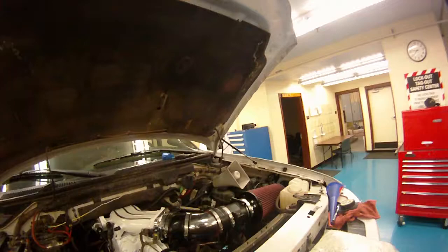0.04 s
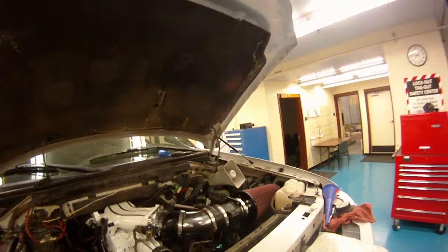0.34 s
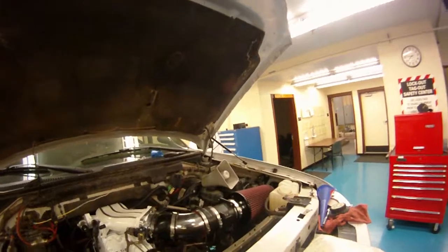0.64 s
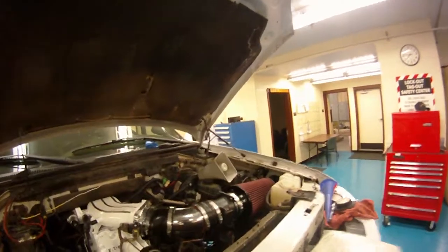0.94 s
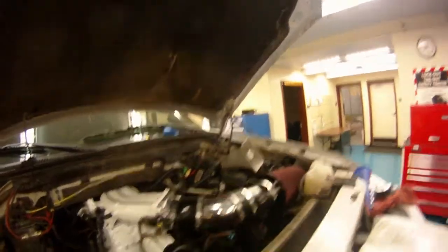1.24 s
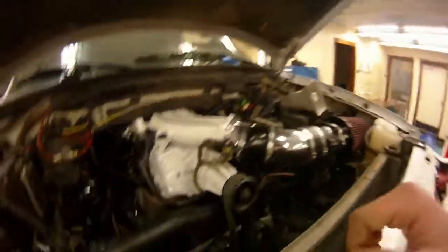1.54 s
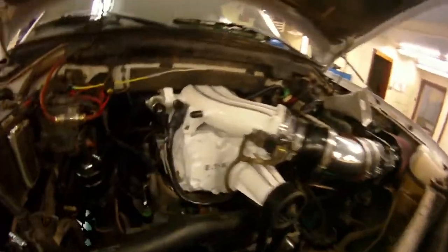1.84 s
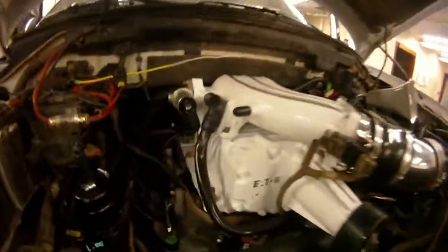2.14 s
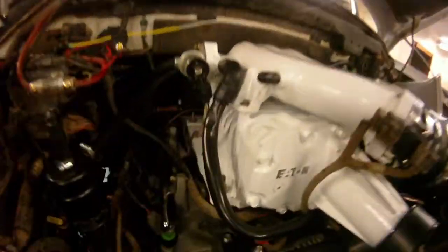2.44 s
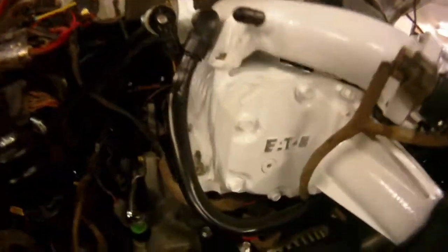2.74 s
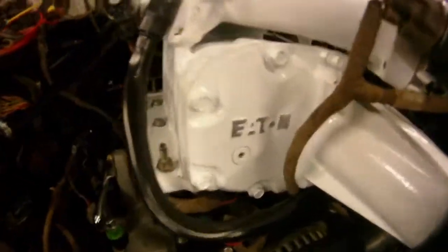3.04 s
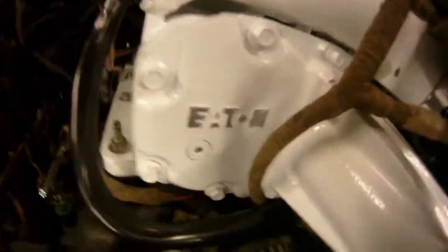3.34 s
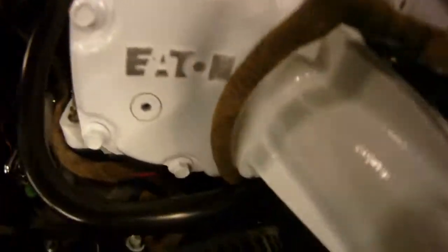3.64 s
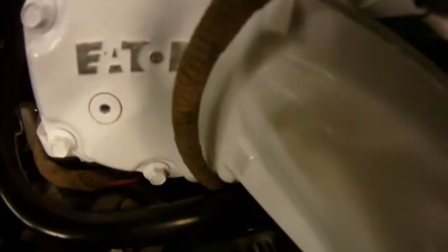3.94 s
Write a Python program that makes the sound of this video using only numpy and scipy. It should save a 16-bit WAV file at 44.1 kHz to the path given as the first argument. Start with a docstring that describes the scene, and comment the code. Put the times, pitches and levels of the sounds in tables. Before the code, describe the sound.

Steady idling of a supercharged engine, whirring and rattling as the microphone moves closer.

```python
"""A supercharged six-cylinder engine idles in a workshop as the microphone moves from wing to blower.
Each firing drives the blower's gears across their play, and the impacts ring the gear case.
Shafts hum at multiples of their turning rates, belts and rotors whir and whine, the intake hisses
and valves tick. Early on, a hand rubs and clicks near the microphone."""
import sys
import numpy as np
from scipy import signal
from scipy.fft import rfft, irfft
from scipy.io import wavfile

SR = 44100
rng = np.random.default_rng(int(sys.argv[2]) if len(sys.argv) > 2 else 0)


def unload_wav(signal):
    """Save mono or channel-first audio to the path in sys.argv[1] as 16-bit WAV at rate SR, clipped to [-1, 1]."""
    wavfile.write(
        sys.argv[1],
        SR,
        np.round(np.clip(np.atleast_2d(signal).T, -1, 1) * 32767).astype(np.int16),
    )


N = 176400
TIME = np.arange(N) / SR
LOG_BIN_HZ = np.log(np.maximum(np.arange(N // 2 + 1) * SR / N, 1))
BLOWER_TURNS_PER_FIRING, CUTOFF_HZ = 1.584, 15300


def from_db(db):
    """Decibels to amplitude ratio."""
    return 10 ** (np.asarray(db) / 20)


def unit_rms(x):
    """Normalisation to unit power."""
    return x / np.sqrt(np.mean(x ** 2) + 1e-20)


def curve(rows):
    """Linear interpolation of (time_s, value) at every sample."""
    return np.interp(TIME, *np.transpose(rows))


def drift(rate_hz):
    """Low-passed noise: a slow random variation of unit spread."""
    pole = np.exp(-80 * np.pi * rate_hz / SR)
    noise = rng.standard_normal(N // 40 + 2002)  # one value per 40 samples
    slow = signal.lfilter([1], [1, -2 * pole, pole * pole], noise)[2000:]
    return np.interp(np.arange(N) / 40, np.arange(len(slow)), unit_rms(slow))


def colour(x, points):
    """Spectral shaping of unit white noise to (frequency_hz, density_db)."""
    hz, db = np.transpose(points)
    gain = from_db(np.interp(LOG_BIN_HZ, np.log(hz), db))
    return irfft(rfft(x) * gain, N) * np.sqrt(SR / 2)


def ring(x, hz, t60_s):
    """A damped resonator: each impulse starts a decaying sine."""
    pole, angle = from_db(-60 / (t60_s * SR)), 2 * np.pi * hz / SR
    return signal.lfilter([0, np.sin(angle)], [1, -2 * pole * np.cos(angle), pole * pole], x + 1e-18)


def band(x, low_hz, high_hz):
    """A band-pass filter with second-order skirts."""
    return signal.sosfilt(signal.butter(2, [low_hz, high_hz], "band", fs=SR, output="sos"), x)


def grains(per_s, spread_db):
    """Shot noise: tiny impacts of random time and size."""
    sizes = from_db(spread_db * np.minimum(rng.exponential(1, N), 4)) * rng.choice([-1, 1], N)
    return unit_rms(sizes * (rng.random(N) < per_s / SR))


def pulses(turns, sharpness):
    """A periodic envelope: one smooth unit pulse per turn."""
    return np.exp(sharpness * (np.cos(2 * np.pi * turns) - 1))


def strikes(rows):
    """One impulse for each (start_s, level_db)."""
    impulses = np.zeros(N)
    for start_s, level_db in rows:
        impulses[int(start_s * SR)] = from_db(level_db)
    return impulses


def harmonic(table):
    """A harmonic series: each row's order is rounded to a whole number."""
    return [(round(order), far_db, near_db) for order, far_db, near_db in table]


def hum(turns, table, near):
    """Partials at multiples of a cycle rate, fluttering in level and phase."""
    out = np.zeros(N)
    for order, far_db, near_db in table:
        level_db = far_db + (near_db - far_db) * near + 2.5 * drift(2.6)
        phase = 2 * np.pi * (order * turns + rng.random()) + .74 * drift(6.9)
        out += np.sqrt(2) * from_db(level_db) * np.sin(phase)
    return out


def shaft_hum(firings, near):
    """Periodic forcing: engine, pulleys and blower shaft radiate tones tied to their speeds."""
    # order (per firing), far_db, near_db
    engine = [(2, -74, -82), (6, -57, -74), (9, -66.5, -61), (13, -59.5, -52.5), (15, -54.5, -60.5),
              (18, -62, -52.5), (20, -64.5, -50.5), (33, -42, -49), (38, -40.5, -49), (198.7, -72.5, -84.5),
              (235, -86.5, -75.5)]
    pulleys = [(2.524, -67, -62.5), (3.79, -63.5, -66), (4.2, -57, -82), (53.3, -51.5, -41.5)]
    # order (per blower turn), far_db, near_db
    blower = [(2, -58.5, -59), (3, -63.5, -60.5), (4, -64, -62)]
    return (hum(firings, harmonic(engine), near) + hum(firings, pulleys, near)
            + hum(BLOWER_TURNS_PER_FIRING * firings, harmonic(blower), near))


def swelling_tone(cycles, levels, wander_hz):
    """Slow modulation: a tone wanders in phase as it swells and fades."""
    return np.sqrt(2) * from_db(curve(levels)) * np.sin(2 * np.pi * cycles + drift(wander_hz))


def drone_and_rotor_tone(firings):
    """Two orders of the firing rate swell and fade as the microphone passes."""
    # envelopes: time_s, level_db
    drone_levels = [(.8, -50), (1.85, -41.5), (2.9, -45.5), (3.9, -41)]
    rotor_levels = [(1.4, -50), (2.3, -44), (2.5, -39), (2.68, -43), (2.84, -34), (3.15, -45), (3.62, -44),
                    (3.76, -34)]
    drone = swelling_tone(21 * firings, drone_levels, wander_hz=2.3)
    return drone + swelling_tone(78.7 * firings, rotor_levels, wander_hz=6)


def whir(firings, near):
    """Broadband noise of belts, rotors and block, amplitude-modulated at the firing rate."""
    # spectral density: frequency_hz, far_db, near_db
    density = [(52.5, -106, -104), (100, -88, -84), (238, -73.5, -80), (313, -79, -82.5), (547, -80, -73),
               (932, -64, -62.5), (1130, -70.5, -65.5), (1533, -59, -55.5), (1770, -65, -58.5),
               (2004, -65, -58), (2370, -73, -66), (2980, -64, -60.5), (3397, -74, -66.5),
               (4160, -85.5, -79), (4990, -99, -92.5), (8000, -125, -120)]
    hz, far_db, near_db = np.transpose(density)
    throb = (1 + .055 * np.cos(2 * np.pi * firings)) * from_db(.42 * drift(7.8))
    far_spectrum = rfft(colour(rng.standard_normal(N) * throb, np.c_[hz, far_db]))
    rush = np.zeros(N)
    # overlapping bands each move from their far level towards their near one
    for weights, rise_db in zip(np.eye(len(hz)), near_db - far_db):
        part = irfft(far_spectrum * np.interp(LOG_BIN_HZ, np.log(hz), weights), N)
        rush += part * from_db(rise_db * near)
    return rush + casing(throb, near)


def casing(throb, near):
    """Forced resonance: the whir stirs the casing into narrow bands of noise."""
    # centre_hz, width_hz, far_db, near_db
    resonances = [(1462, 130, -64.5, -38.5), (1923, 83, -42.5, -34), (2158, 55, -60, -48),
                  (3110, 80, -43.5, -46.5)]
    out = np.zeros(N)
    for centre_hz, width_hz, far_db, near_db in resonances:
        stirred = band(rng.standard_normal(N) * throb, centre_hz - width_hz / 2, centre_hz + width_hz / 2)
        out += unit_rms(stirred) * from_db(far_db + (near_db - far_db) * near)
    return out


def gear_case(impacts):
    """Modal response: each impact rings the case's damped modes, in alternating polarity."""
    # pitch_hz, gain_db, t60_s
    modes = [(1498, -12.5, 0.054), (1617, -4, 0.049), (1653, -13, 0.0039), (2120, -11, 0.009),
             (3150, -13.5, 0.021)]
    ringing = sum((-1) ** k * from_db(db) * ring(impacts, hz, t60) for k, (hz, db, t60) in enumerate(modes))
    return band(ringing, low_hz=740, high_hz=3660)


def gear_rattle(firings):
    """Backlash: at each firing the teeth cross their play in a burst of impacts over a pulsing mesh tone."""
    # envelope before the trim: time_s, level_db
    levels = [(.12, -32), (.92, -52), (1.12, -22.5), (1.22, -25), (1.35, -33.5), (1.85, -27), (2.35, -28),
              (2.5, -24), (3.3, -26), (3.5, -30.5), (4, -29)]
    mesh_order, mesh_share, trim_db, lead_periods = 40.5, .8, -3, .06
    load = .42 + pulses(firings, sharpness=2.2)
    blows = np.diff(np.floor(firings + lead_periods + .004 * drift(14.1)), prepend=0)  # one per firing
    impacts = grains(per_s=2000, spread_db=3.5) * load + .6 * unit_rms(blows)
    mesh = load * np.sin(2 * np.pi * mesh_order * firings + drift(6.8))
    rattle = np.sqrt(1 - mesh_share) * unit_rms(gear_case(impacts)) + np.sqrt(mesh_share) * unit_rms(mesh)
    return rattle * from_db(curve(levels) + trim_db + .6 * drift(25))


def rotor_whine(firings):
    """Amplitude modulation: an unsteady high tone flutters with each turn of the blower."""
    # envelope: time_s, level_db
    levels = [(.12, -55), (1.35, -68), (1.55, -51), (1.87, -48), (2.14, -52.5), (2.24, -45), (2.6, -55.5),
              (3.3, -54), (4, -43.5)]
    order = 105.6
    tone = np.sin(2 * np.pi * order * firings + 1.17 * drift(13))
    throb = 1 + .6 * np.cos(2 * np.pi * BLOWER_TURNS_PER_FIRING * firings)
    return unit_rms(tone * throb) * from_db(curve(levels))


def intake_hiss(firings):
    """Flow noise: the intake air pulses with each turn of the blower."""
    # envelope: time_s, level_db
    levels = [(.1, -60), (1.2, -59), (2.1, -49), (3, -46)]
    # frequency_hz, relative_db
    spectrum = [(3000, -21), (5100, -11.5), (6050, 0), (7000, -10.5), (8500, -19), (9900, -21),
                (15000, -31)]
    throb = 1 + .2 * np.cos(2 * np.pi * BLOWER_TURNS_PER_FIRING * firings)
    air = colour(rng.standard_normal(N) * throb, spectrum)
    return unit_rms(air) * from_db(curve(levels))


def valve_ticks(firings):
    """Impact noise: the valves give short broadband bursts, five to every six firings."""
    # envelope: time_s, level_db
    levels = [(.1, -78.5), (1.9, -79), (3.05, -63), (3.6, -70)]
    # frequency_hz, relative_db
    spectrum = [(3000, -9), (11500, -8), (15000, -10)]
    bursts = rng.standard_normal(N) * pulses(5 / 6 * firings, sharpness=9)
    ticks = colour(bursts * from_db(1.6 * drift(20)), spectrum)
    return unit_rms(ticks) * from_db(curve(levels))


def hand_rubs():
    """Friction: a sliding hand makes dense tiny impacts that merge into grainy noise."""
    # start_s, length_s, level_db, relative_treble_db
    strokes = [(0.275, 0.11, -31, -42), (0.349, 0.31, -30.5, -30), (1.228, 0.1, -29.5, -19.5)]
    # frequency_hz, relative_db
    body_spectrum = [(300, -43), (1700, 3), (2700, 1.5), (3600, -16), (6300, -42), (11000, -50.5)]
    treble_spectrum = [(300, -50), (5500, 4.5), (8000, -7.5), (9900, -8), (15000, -26)]
    body, treble = (unit_rms(colour(grains(per_s=3800, spread_db=2.5), spectrum))
                    for spectrum in (body_spectrum, treble_spectrum))
    out, fade_s = np.zeros(N), .064
    for start_s, length_s, level_db, treble_db in strokes:
        fade = np.clip(np.minimum(TIME - start_s, start_s + length_s - TIME) / fade_s, 0, 1)
        out += fade * from_db(level_db) * (body + from_db(treble_db) * treble)
    return out


def hand_clicks():
    """Impulse response: handling strikes two heavily damped modes, giving dry clicks."""
    # start_s, strength_db
    taps = [(.2925, -11), (.301, -11), (.4775, -9), (.5535, -6), (.653, -15)]
    # pitch_hz, gain_db, t60_s
    modes = [(1620, 0, .014), (2350, -1, .009)]
    ringing = sum(from_db(db) * ring(strikes(taps) / 2, hz, t60) for hz, db, t60 in modes)
    return band(ringing, low_hz=1030, high_hz=3700)


def gear_knocks():
    """Impulsive excitation: the hardest tooth impacts ring the case as single knocks."""
    # start_s, strength_db
    knocks = [(1.106, -14), (1.784, -10), (1.834, -13.5), (1.964, -9), (1.989, -11.5), (2.219, -8.5),
              (2.468, -9), (2.723, -7.5), (2.774, -14.5)]
    return gear_case(strikes(knocks))


def squeak(peak_s=1.285, spread_s=.031, pitch_hz=3080, width_hz=200, level_db=-31):
    """Narrow-band resonance: the last rub rings briefly."""
    tone = band(rng.standard_normal(N), pitch_hz - width_hz / 2, pitch_hz + width_hz / 2)
    return unit_rms(tone) * from_db(level_db) * np.exp(-((TIME - peak_s) / spread_s) ** 2)


def snap(start_s=1.763, strength_db=-22):
    """An impulse confined to the treble is heard as one thin, bright tick."""
    return band(strikes([(start_s, strength_db)]), low_hz=7000, high_hz=CUTOFF_HZ)


def scene():
    """One speed sets the engine's pitches and pulses; nearness sets the balance of hum and whir."""
    # engine speed: time_s, firing_rate_hz
    speed = [(0, 39.85), (.8, 39.65), (1.7, 39.6), (2.2, 39.35), (3.4, 39.7), (3.8, 40.05)]
    # microphone path: time_s, nearness (0 at the wing, 1 over the blower, above 1 closer still)
    approach = [(.1, 0.081), (1.3, 0.2), (1.6, 0.38), (2, 0.74), (2.6, 1.09), (3.2, 1.17), (3.8, 1.48)]
    firings = np.cumsum(curve(speed) * (1 + .0012 * drift(4.05))) / SR
    near = curve(approach)
    engine = (shaft_hum(firings, near) + drone_and_rotor_tone(firings) + whir(firings, near)
              + gear_rattle(firings) + rotor_whine(firings) + intake_hiss(firings) + valve_ticks(firings))
    return (engine + hand_rubs() + hand_clicks() + gear_knocks() + squeak() + snap())[None]


def record(dry):
    """Gating and band limiting: the microphone opens just after the start; the top is cut steeply."""
    open_s, fade_s = .105, .002
    opened = np.clip((TIME - open_s) / fade_s, 0, 1)
    return signal.sosfilt(signal.ellip(10, .1, 80, CUTOFF_HZ, fs=SR, output="sos"), dry * opened)


dry = scene()
out = record(dry)
unload_wav(out)
```